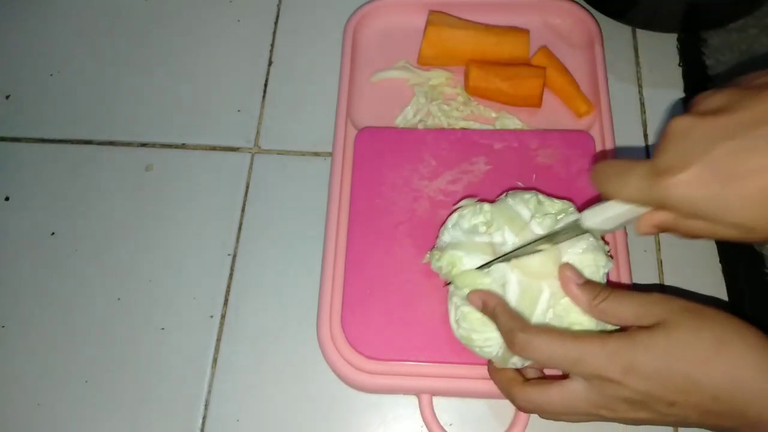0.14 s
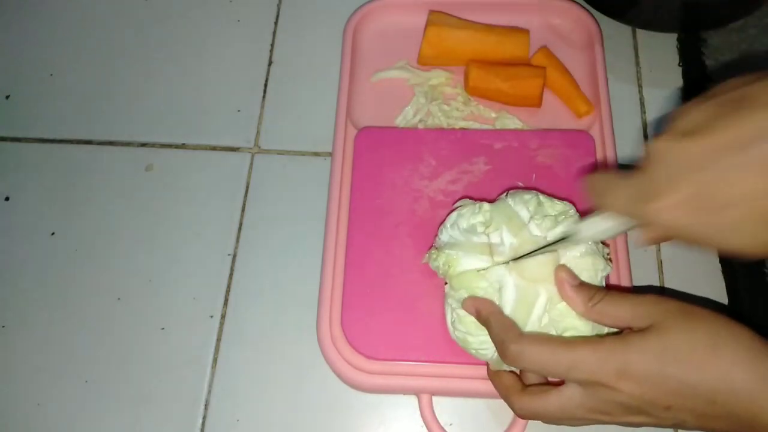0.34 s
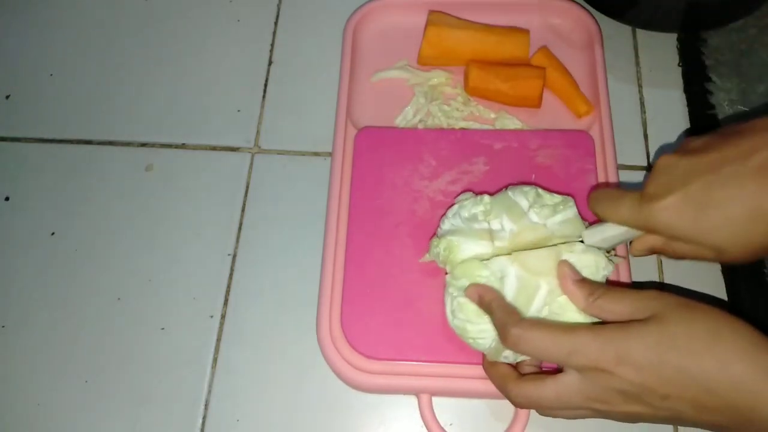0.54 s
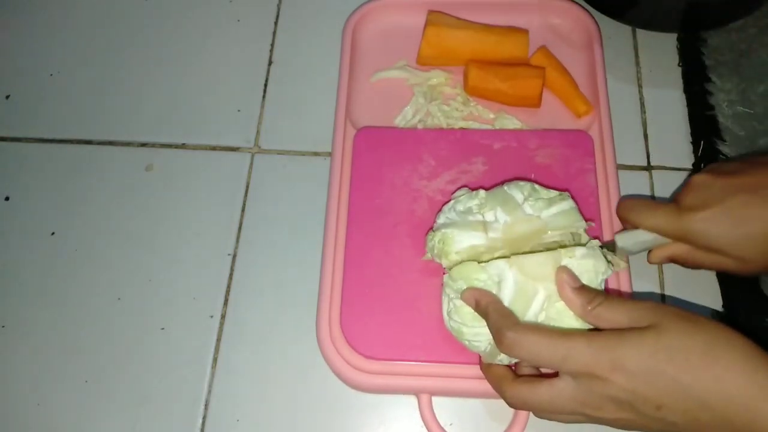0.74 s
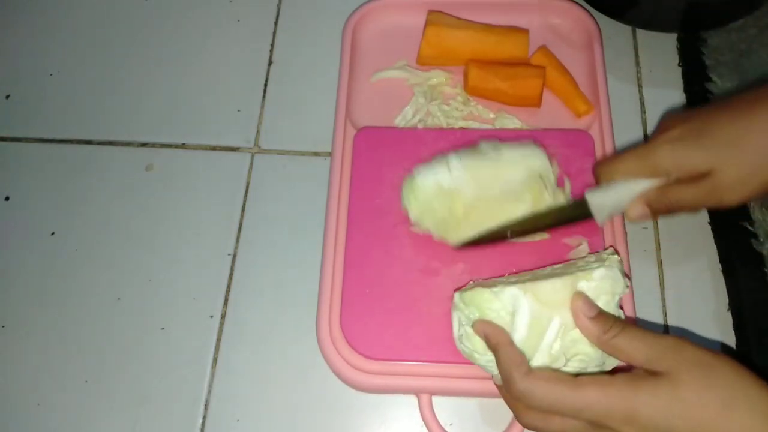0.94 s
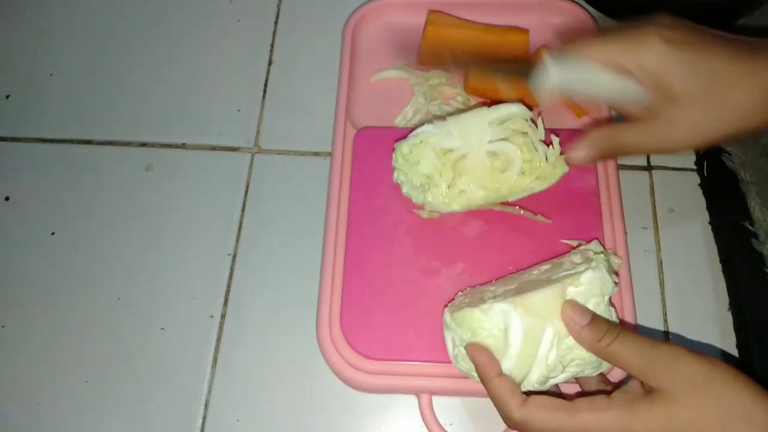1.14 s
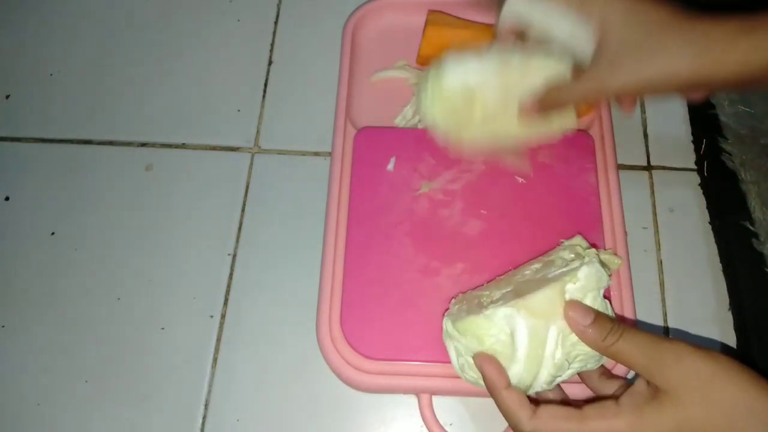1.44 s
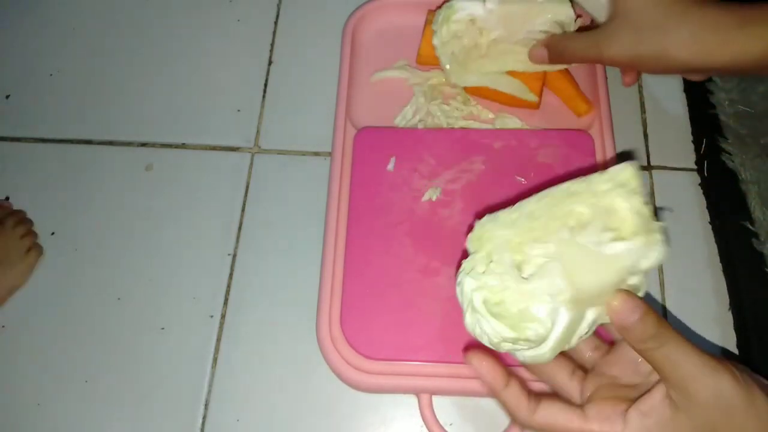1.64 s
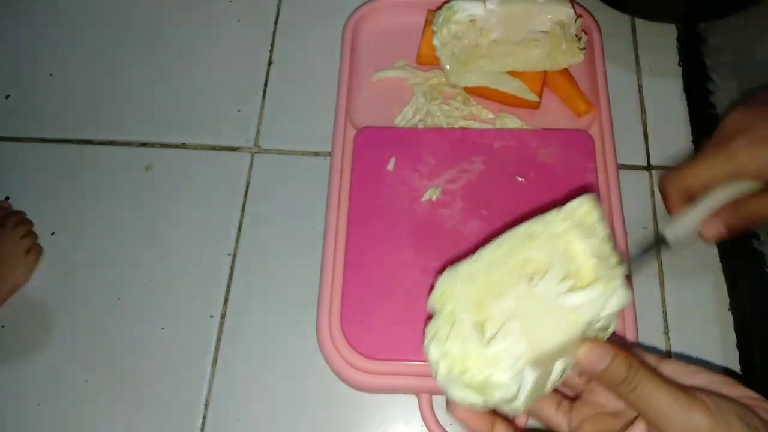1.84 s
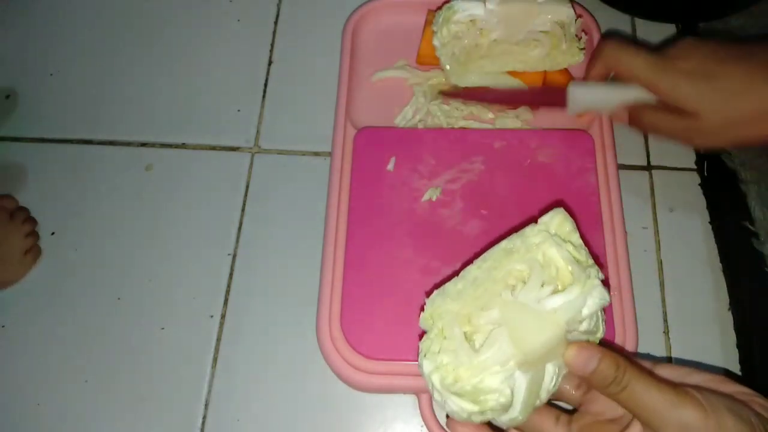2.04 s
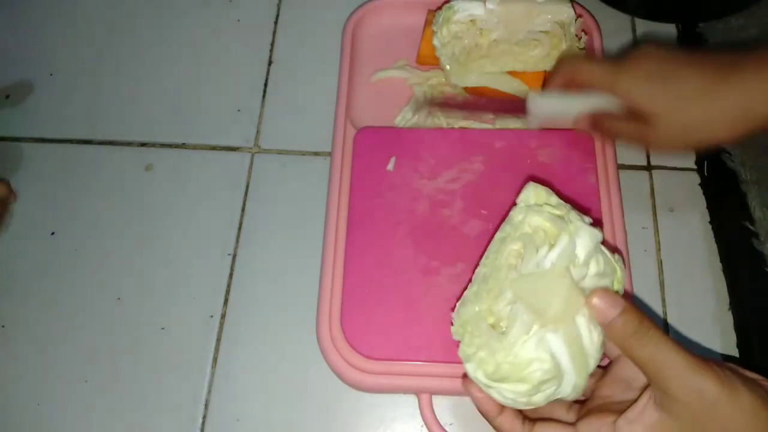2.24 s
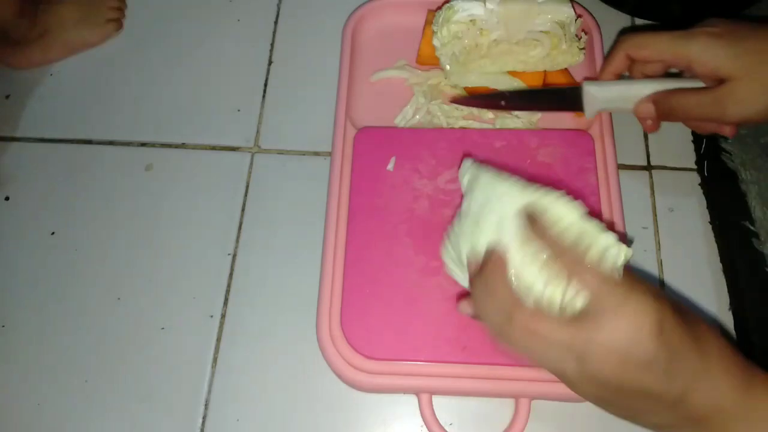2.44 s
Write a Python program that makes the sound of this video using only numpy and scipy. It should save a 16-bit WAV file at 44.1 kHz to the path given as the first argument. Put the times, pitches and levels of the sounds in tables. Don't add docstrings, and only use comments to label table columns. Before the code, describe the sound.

Crisp cabbage cutting in jerky pushes, then the pieces drag and squeak across a plastic board

```python
import sys
import numpy as np
from scipy import signal
from scipy.fft import rfft, irfft
from scipy.io import wavfile
from scipy.ndimage import uniform_filter1d

SR = 44100
rng = np.random.default_rng(int(sys.argv[2]) if len(sys.argv) > 2 else 0)


def amplitude_ratio(level_db):
    exponent = np.asarray(level_db, float) / 20
    return 10 ** exponent


def wav_out(sig):
    wavfile.write(sys.argv[1], SR, np.round(np.clip(np.atleast_2d(sig).T, -1, 1) * 32767).astype(np.int16))


N = 114660
T = np.arange(N) / SR

# f/Hz, level/dB
LEAF_TONE = [(300, -3), (1000, 2), (2000, 1), (4000, -4), (5500, -6.5), (8000, -5.5), (12000, -14),
             (16000, 0.5)]


def unit(x):
    return x / np.sqrt(np.mean(x ** 2))


def ring(x, hz, width_hz):
    return signal.lfilter(*signal.iirpeak(hz, hz / width_hz, fs=SR), x)


def colour(x, tone, size=4096):
    hz, db = np.array(tone, float).T
    bins_hz = np.arange(size + 1) * SR / 2 / size
    gain = amplitude_ratio(np.interp(np.log(bins_hz + 1), np.log(hz), db))
    cepstrum = irfft(np.log(gain))
    cepstrum[1:size] *= 2
    cepstrum[size + 1:] = 0
    response = irfft(np.exp(rfft(cepstrum)))
    return signal.fftconvolve(x, response / np.sqrt(np.sum(response ** 2)))[:N]


def walk(rate_hz):
    span = int(SR / rate_hz)
    smooth = uniform_filter1d(rng.standard_normal(N), span)
    return unit(uniform_filter1d(smooth, span))


def air():
    # f/Hz, level/dB
    air_tone = [(25, -9.5), (58, -3), (110, -13), (200, -11.5), (350, -21.5), (1200, -20), (4000, -37),
                (15000, -41.5)]
    # t/s, level/dB
    gain_drift = [(0, 1), (.4, 4), (1.2, -1), (2.0, 2), (2.6, 0)]
    level_db = -47.5 + np.interp(T, *np.array(gain_drift).T) + .5 * walk(9.4)
    return amplitude_ratio(level_db) * colour(rng.standard_normal(N), air_tone)


def tiled_room(near):
    t60_s, level_db, treble_hz = 0.19, -15.5, 3660
    u = T[:SR // 2]
    tail = rng.standard_normal(len(u)) * amplitude_ratio(-60 * u / t60_s)
    tail *= u > .004
    tail = signal.lfilter(*signal.butter(1, treble_hz, fs=SR), tail)
    return amplitude_ratio(level_db) * signal.fftconvolve(near, tail / np.sqrt(np.sum(tail ** 2)))[:N]


def board(x):
    # f/Hz, width/Hz, level/dB
    modes = [(450.6, 73, -2.5), (642, 150, 1.5), (893, 94, -3.5), (933, 47, 3.5), (1226, 110, -6),
             (1544, 91, -1.5), (2020, 146, -9.5), (3070, 75, -17)]
    return sum((-1) ** k * amplitude_ratio(db) * ring(x, hz, width) for k, (hz, width, db) in enumerate(modes))


def stick_slip(glide, width_hz, octave_db, twelfth_db):
    t, hz, db, *more = np.array(glide).T
    phase = 2 * np.pi * np.cumsum(np.interp(T, t, hz)) / SR
    bright_db = np.interp(T, t, more[0]) if more else 0
    partials = [(1, 0), (2, octave_db + bright_db), (2.9, twelfth_db + bright_db)]
    tone = 0
    for multiple, level_db in partials:
        wave = walk(2 * width_hz) * np.sin(multiple * phase)
        wave = wave + walk(2 * width_hz) * np.cos(multiple * phase)
        tone = tone + amplitude_ratio(level_db) * wave
    envelope = amplitude_ratio(np.interp(T, t, db, left=-99, right=-99))
    return tone * uniform_filter1d(envelope, size=60)


def tray_rubs():
    # t/s, f/Hz, level/dB
    hand = [
        (1.485, 771, -45),
        (1.518, 799, -39.5),
        (1.535, 786, -40.5),
        (1.555, 788, -33),
        (1.575, 792, -55),
        (1.6, 790, -54),
    ]
    # t/s, f/Hz, level/dB
    hand_low = [
        (1.535, 680, -59),
        (1.566, 676, -34),
        (1.585, 646, -35.5),
        (1.6, 653, -39),
        (1.615, 712, -40.5),
        (1.645, 664, -50),
    ]
    return stick_slip(hand, 110, -13, -40) + stick_slip(hand_low, 110, -40, -40)


def squeals():
    # t/s, f/Hz, level/dB, overtones/dB
    heavy = [
        [(1.965, 640, -32.5, -26), (1.977, 640, -26, -7), (1.986, 630, -39, -15), (1.996, 620, -28.5, -8),
         (2.018, 585, -31.5, 5.5), (2.04, 636, -33.5, 2), (2.066, 590, -32.5, -11), (2.09, 553, -48, 5)],
        [(2.255, 520, -36.5, -11), (2.281, 620, -31, -8), (2.295, 570, -27.5, -13), (2.315, 620, -34, -3),
         (2.34, 666, -38, 0)],
    ]
    # t/s, f/Hz, level/dB
    light = [
        [(1.399, 1128, -38), (1.409, 1111, -32), (1.421, 1197, -41), (1.435, 1090, -54)],
        [(1.822, 1063, -45), (1.84, 1082, -50), (1.866, 1090, -44), (1.895, 1134, -55)],
        [(2.258, 2050, -48), (2.28, 1907, -26), (2.292, 1900, -51)],
        [(2.295, 1276, -43), (2.32, 1335, -31), (2.335, 1270, -53)],
        [(.99, 595, -51), (1.005, 593, -41), (1.03, 576, -54)],
    ]
    return (sum(stick_slip(glide, 60, -1, -7) for glide in heavy)
            + sum(stick_slip(glide, 110, -13, -40) for glide in light))


def grains(per_s, spread_db, ms):
    borders = (700, 2500, 5500, 9500)
    out, shared = 0, rng.random((2, N))
    for lo, hi in zip((20,) + borders, borders + (20000,)):
        chance, size = np.where(rng.random(N) < .4, shared, rng.random((2, N)))
        bursts = (chance < per_s / SR) * amplitude_ratio(-spread_db * np.log(size + 0.0062))
        bursts = signal.lfilter([1], [1, -np.exp(-1000 / (ms * SR))], bursts)
        band = signal.butter(2, (lo, hi), "band", fs=SR, output="sos")
        out = out + signal.sosfilt(band, bursts * rng.standard_normal(N))
    clumps_db = 1.2 * walk(150)
    return unit(out * amplitude_ratio(clumps_db))


def strokes(pushes):
    power = np.zeros((2, N))
    for start, rise, fall, direct_db, board_db in pushes:
        u = T - start - rise
        shape = np.clip(np.where(u < 0, -u / rise, u / fall), 0, 3)
        level_db = np.array([[direct_db], [board_db]]) - 25 * shape ** 2
        power += amplitude_ratio(level_db) ** 2 * (u > -rise)
    return np.sqrt(power)


def rubbing(pushes, grit, tone):
    direct, body = strokes(pushes)
    return colour(grit * direct, tone) + board(grit * body) / np.std(board(grit))


def drags():
    # t/s, rise/s, fall/s, hiss level/dB, board level/dB
    drag_strokes = [(-.1, 0.064, 0.32, -50.5, -46.5), (.988, 0.012, 0.02, -46.5, -37.5),
                    (1.396, 0.015, 0.026, -47.5, -34.5), (1.43, 0.015, 0.14, -52, -53),
                    (1.6, 0.0062, 0.043, -53, -41), (1.65, 0.02, 0.025, -49, -43.5),
                    (1.822, 0.0059, 0.019, -45.5, -40.5), (1.84, 0.012, 0.038, -46.5, -42),
                    (1.49, 0.064, .08, -61, -46), (1.963, 0.01, 0.023, -51, -33),
                    (1.998, .027, 0.032, -27.5, -25.5), (2.025, 0.025, 0.044, -27, -27.5),
                    (2.07, 0.0069, 0.017, -31.5, -33.5), (2.09, 0.011, 0.04, -48.5, -47.5),
                    (2.228, 0.0028, 0.058, -61, -36.5), (2.255, 0.03, 0.022, -34.5, -29.5),
                    (2.282, .018, 0.028, -29, -26.5), (2.305, 0.011, 0.02, -33, -28.5),
                    (2.33, 0.012, 0.048, -47.5, -43.5)]
    # f/Hz, level/dB
    skin_tone = [(300, -13.5), (1000, 3), (2500, 2), (4000, -4.5), (5500, -6), (8000, -6), (12000, -14.5),
                 (16000, -7)]
    return rubbing(drag_strokes, grains(per_s=1800, spread_db=2.2, ms=1.8), skin_tone)


def knocks():
    # t/s, peak level/dB, f/Hz, t60/s, contact/ms
    board_knocks = [(0.2117, -24, 1320, 0.14, 0.18), (.2295, -21, 2010, 0.058, .15),
                    (2.2275, -19, 1800, 0.023, 0.27), (2.1, -21.5, 2930, .02, 0.34),
                    (1.968, -35, 2400, 0.05, 0.22), (1.6035, -28.5, 3090, 0.039, 0.15),
                    (0.302, -22.5, 480, 0.0052, 0.84), (.323, -12, 810, 0.0054, 0.25),
                    (0.571, -8.5, 530, 0.044, 1.06), (.5555, -17, 1400, 0.03, 0.25),
                    (.816, -22, 263, 0.025, 1.1), (0.615, -19, 1450, 0.0097, 0.57),
                    (.791, -14, 890, 0.035, 0.22), (.818, -12, 620, 0.041, 0.1),
                    (0.8254, -8.5, 914, 0.042, 0.36), (.8265, -16, 1400, 0.061, 0.21),
                    (.33, -26.5, 297, 0.083, 1.4), (1.38, -24, 780, 0.011, 0.86),
                    (1.603, -18, 830, 0.0035, 0.51), (1.685, -22, 930, 0.0073, 0.54),
                    (1.857, -23, 1200, 0.01, 0.18), (1.777, -37, 1250, 0.065, 0.37),
                    (2.227, -13, 514, 0.026, 0.41)]
    # t/s, peak level/dB, f/Hz, t60/s, contact/ms
    cracks = [
        (.2108, -13, 7400, .005, .06),
        (.5465, -13, 13500, .004, .03),
        (.3292, -17, 2000, .015, .1),
        (.59, -26, 550, .35, .8),
        (.8183, -9, 3000, .004, .08),
        (.8255, -12, 12000, .004, .03),
    ]
    size, lead = SR // 3, 200
    high_pass = signal.butter(1, 480, "high", fs=SR)
    out = np.zeros(N + size)
    for t0, db, hz, t60, contact_ms in board_knocks + cracks:
        i = int(t0 * SR) - lead
        u = T[:size] + i / SR - t0
        push = -np.exp(-.5 * (u * 4000 / contact_ms) ** 2)
        push = signal.lfilter(*high_pass, push)
        patch = ring(push, hz, 6.54 / t60)
        whole = board(push)
        knock = patch / np.abs(patch).max() + amplitude_ratio(-10) * whole / np.abs(whole).max()
        out[i:i + size] += amplitude_ratio(db) * knock
    return out[:N]


def snaps():
    # t/s, peak level/dB, f/Hz
    ribs = [(0.1341, -26.5, 1730), (0.162, -30, 1880), (0.182, -36, 1920), (0.2052, -24, 8500),
            (0.2279, -16, 6460), (0.2508, -24, 5000), (0.2638, -13.5, 1650), (0.2744, -18, 7710),
            (0.3644, -31, 2130), (0.3685, -16, 7800), (.3725, -21, 5000), (0.3808, -19.5, 4250),
            (0.3852, -21, 4370), (0.397, -21, 7000), (0.4036, -17, 3470), (0.4554, -24, 8000),
            (0.5184, -28, 7930), (0.5262, -14, 4100), (.5385, -17, 2000), (0.5554, -6, 1520),
            (0.559, -10.5, 7460), (.561, -22, 7400), (0.6218, -8, 8250), (0.6254, -17, 6800),
            (0.631, -15, 6000), (.641, -18, 7050), (0.6904, -20, 7600), (0.7164, -21, 1500),
            (0.7667, -15, 8000), (.7797, -16, 7600), (0.7851, -9.5, 6800), (0.8024, -8.5, 8000),
            (0.8155, -3, 2130), (.8167, -21, 7800), (0.8245, -4, 1880),
            (0.8814, -22, 2530), (0.9073, -19, 7340), (0.9243, -15, 7800), (0.9268, -14, 1470),
            (0.94, -31, 7510), (0.9477, -14.5, 3080), (0.9534, -29, 8100), (0.9594, -16, 3540),
            (.9672, -22, 1200), (0.9728, -18.5, 1900), (1.041, -27.5, 2440), (1.371, -30, 1670),
            (1.4544, -27, 1480), (1.603, -20, 2020), (2.5914, -17.5, 1690)]
    size, q, decay_ms = 512, 2.5, 1.1
    out = np.zeros(N + size)
    for t0, db, hz in ribs:
        noise = rng.standard_normal(size) * np.exp(-np.arange(size) * 1000 / SR / decay_ms)
        crack = np.sqrt(q) * ring(noise, hz, hz / q) + amplitude_ratio(-2.5) * noise
        i = int(t0 * SR)
        out[i:i + size] += amplitude_ratio(db - 3.5) * crack / np.abs(crack).max()
    return colour(out[:N], LEAF_TONE) + 4 * amplitude_ratio(-7.5) * board(out[:N])


def cuts():
    # t/s, rise/s, fall/s, crackle level/dB, board level/dB
    blade_pushes = [(.1, 0.085, 0.037, -43, -45), (.196, 0.011, .012, -31, -39),
                    (.209, .004, 0.034, -31, -41), (.224, 0.0032, 0.043, -33.5, -35.5),
                    (.259, 0.0087, 0.024, -33, -38), (.27, 0.0076, 0.051, -33.5, -37),
                    (.312, 0.012, 0.036, -30, -37.5), (.355, 0.0071, 0.12, -39.5, -65),
                    (.41, 0.0087, 0.13, -46, -43), (.508, 0.025, 0.022, -32, -32),
                    (.53, 0.013, 0.017, -32, -34), (.545, 0.0033, 0.013, -23, -35),
                    (.553, 0.0076, 0.011, -23.5, -26.5), (.562, 0.0087, 0.0076, -21, -20.5),
                    (.603, 0.0046, 0.029, -30.5, -43), (.618, 0.0055, 0.062, -30, -39),
                    (.65, 0.024, 0.16, -36, -37.5), (.748, 0.0083, 0.013, -32.5, -35),
                    (.765, 0.0055, 0.052, -31.5, -30.5), (.783, 0.0035, .007, -21, -43),
                    (.789, 0.0027, 0.023, -22.5, -23.5), (.798, 0.0086, 0.024, -26, -26.5),
                    (.811, 0.0058, 0.023, -21, -20), (.82, 0.0031, 0.0056, -20, -20),
                    (.83, 0.0073, 0.35, -48, -58), (.92, 0.036, 0.017, -32, -49.5),
                    (2.58, 0.013, 0.0056, -35.5, -42)]
    return rubbing(blade_pushes, grains(per_s=2200, spread_db=3, ms=.6), LEAF_TONE)


def scene():
    near = tray_rubs() + squeals() + drags() + knocks() + snaps() + cuts()
    return (near + tiled_room(near) + air())[None]


def low_pass(x):
    return signal.sosfilt(signal.butter(12, 15940, fs=SR, output="sos"), x)


def record(dry):
    # f/Hz, width/Hz, level re direct/dB
    port = [(7440, 626, 2)]
    x = dry + sum(amplitude_ratio(db) * ring(dry, hz, width) for hz, width, db in port)
    x = signal.sosfilt(signal.ellip(12, .2, 95, 15550, fs=SR, output="sos"), x)
    return low_pass(x)


dry = scene()
out = record(dry)
wav_out(out)
```